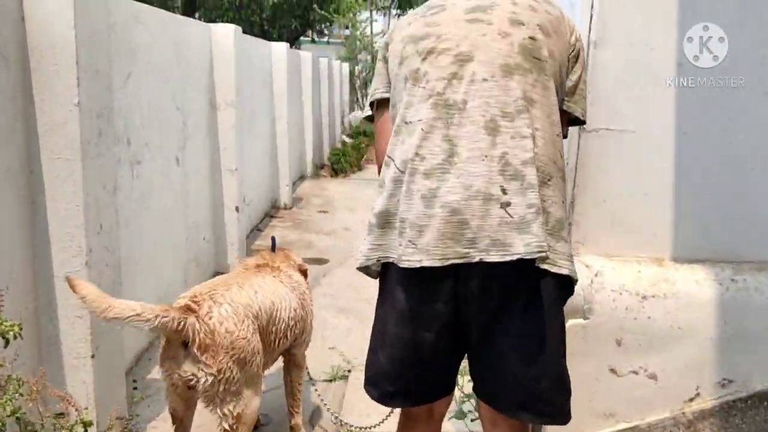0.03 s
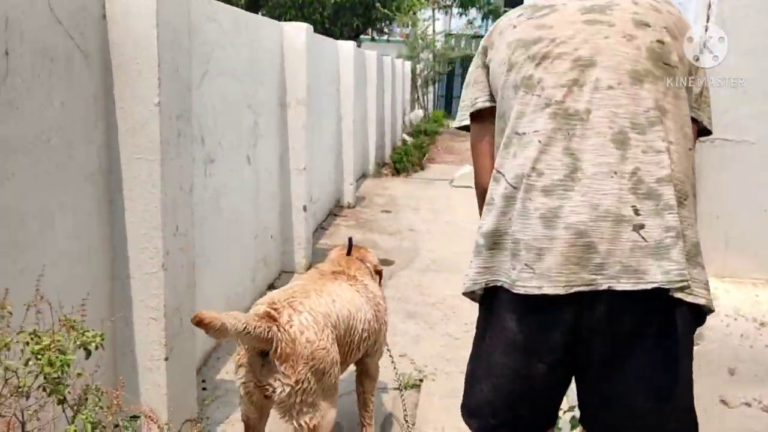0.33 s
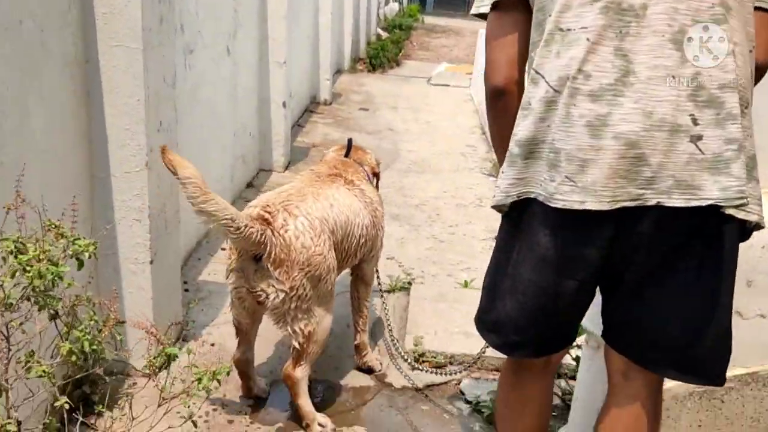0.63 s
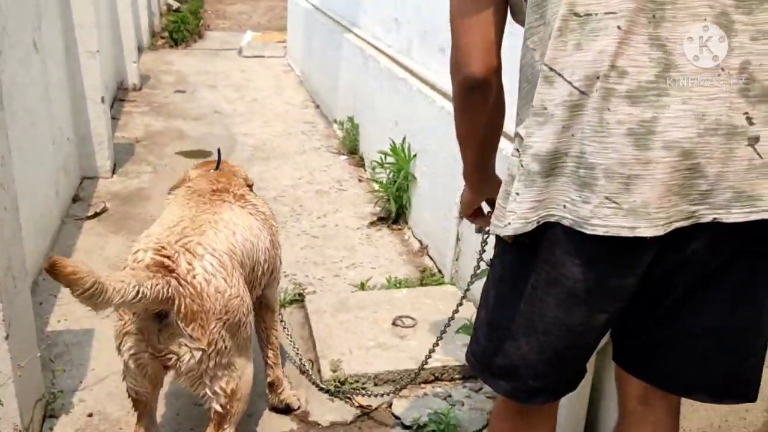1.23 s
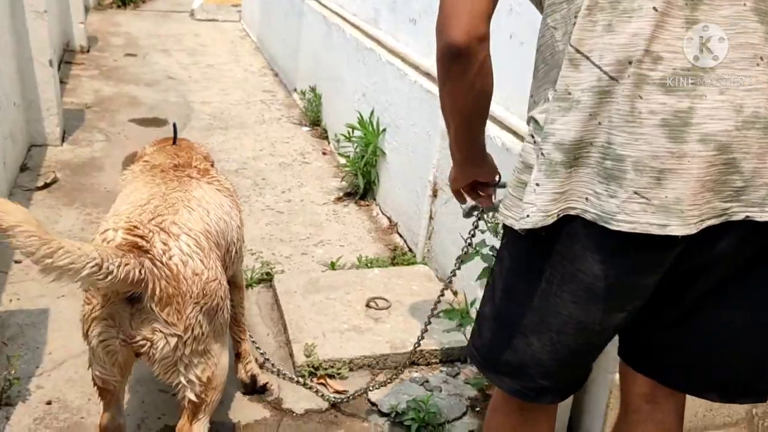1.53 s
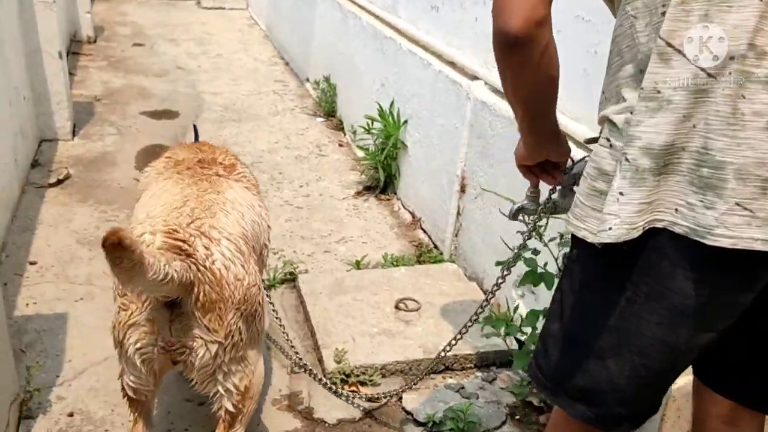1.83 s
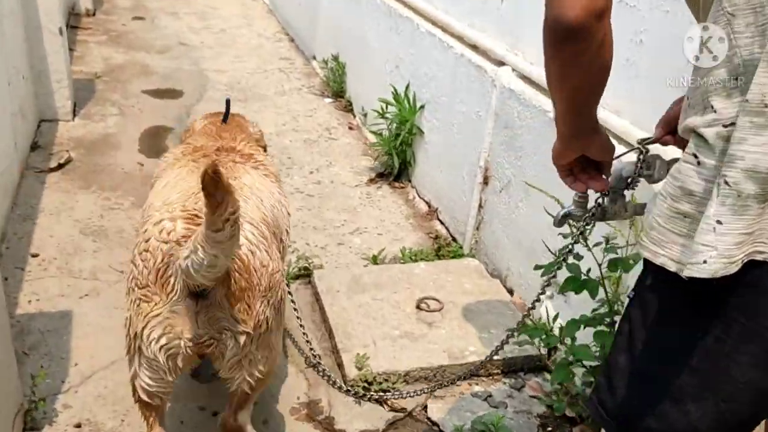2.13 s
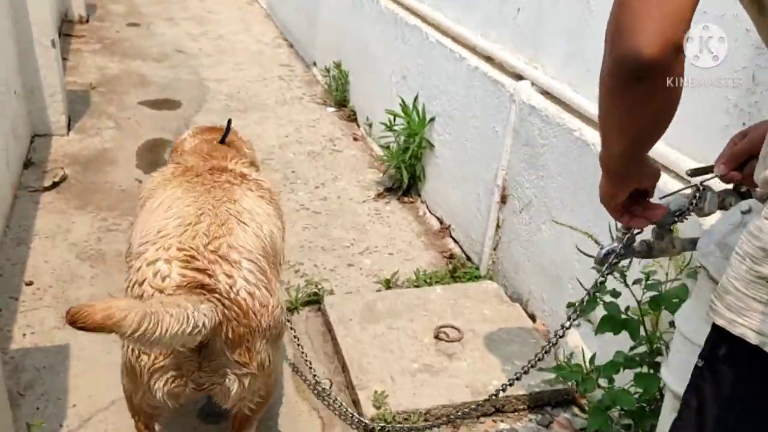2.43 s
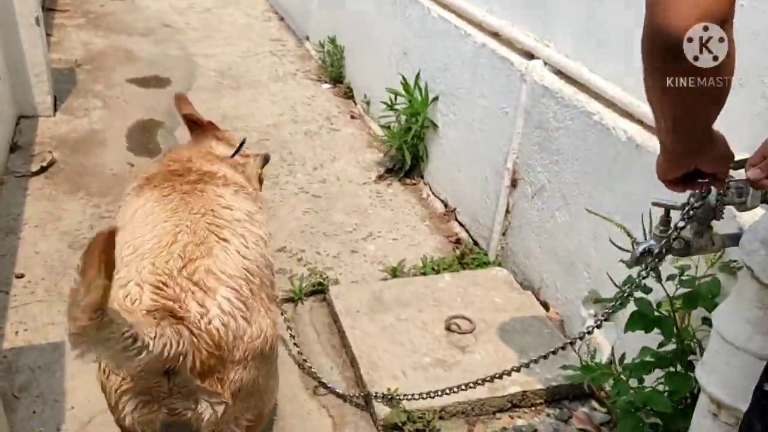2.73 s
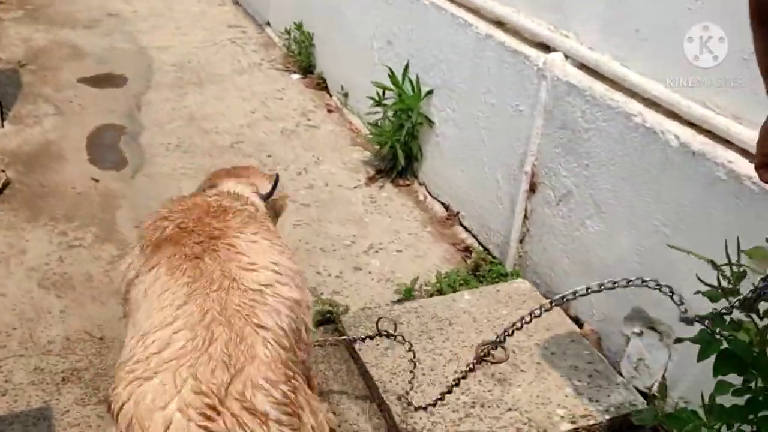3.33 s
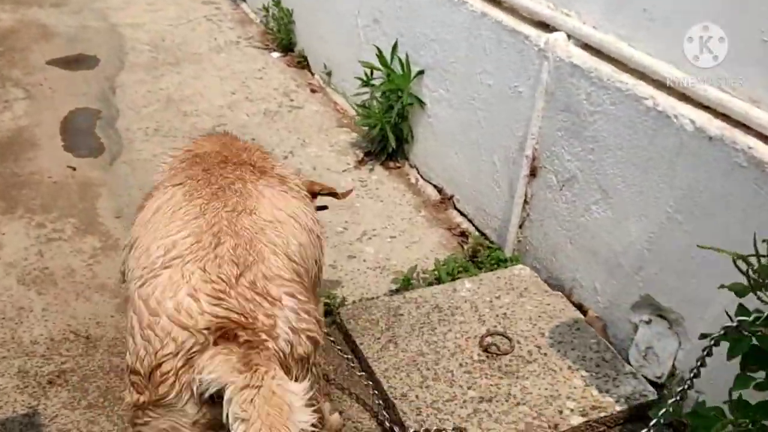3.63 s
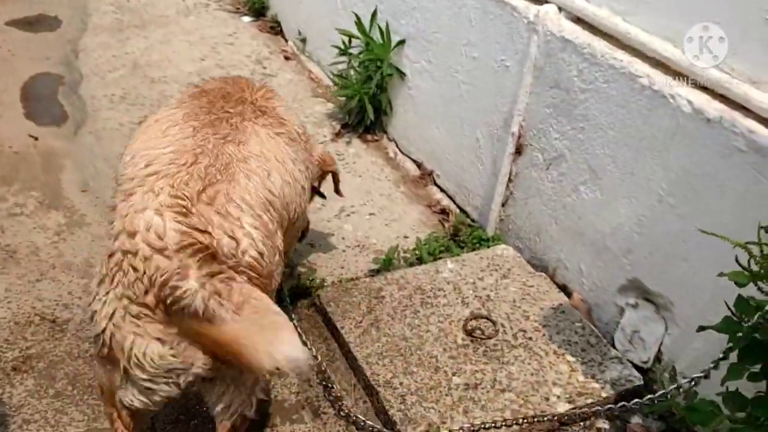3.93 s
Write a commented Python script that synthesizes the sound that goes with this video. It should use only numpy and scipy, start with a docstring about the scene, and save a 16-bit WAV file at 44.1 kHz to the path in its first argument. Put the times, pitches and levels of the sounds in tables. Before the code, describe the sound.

A dog's metal chain clinks lightly over gritty steps and faint panting in an outdoor concrete passage. Then the dog shakes its head, ears flapping, and the chain clatters and scrapes on the ground nearby, over steady high hiss.

```python
"""A concrete passage with a panting dog on a chain. Steel links collide and ring, a sandal scuffs grit,
then the dog shakes its head: ears slap, links clatter, scrape and crack on the slabs.
The pants are air rushing through a throat resonance; cloth and fur rustle; the walls reflect.
Behind it: outdoor air, a steady high hiss, a distant engine and a thin whistle like a far bird."""
import sys
import numpy as np
from scipy import signal
from scipy.fft import rfft, irfft
from scipy.io import wavfile

SR = 44100
rng = np.random.default_rng(int(sys.argv[2]) if len(sys.argv) > 2 else 0)


def waveform_to_disk(signal):
    """Save audio, clipped to [-1, 1], as 16-bit WAV at the path in sys.argv[1]."""
    frames = np.transpose(np.atleast_2d(signal))
    scaled = np.clip(frames, -1, 1) * 32767
    samples = np.round(scaled).astype(np.int16)
    wavfile.write(sys.argv[1], SR, samples)


N = 176400

# Spectra. Each row: frequency in Hz, relative gain in dB.
AIR_COLOUR = [(20, -10), (45, -6), (65, -9), (110, -6), (180, -2), (320, -5), (430, -11), (700, -14),
              (950, -13), (1300, -14), (1800, -19.5), (2800, -20), (4500, -28), (6000, -29), (9000, -31),
              (10200, -49), (15000, -53), (16200, -64)]
HISS_COLOUR = [(5500, -23), (6450, -11), (6850, -2), (7030, -18), (7230, 7.5), (7320, -9.5), (7430, 6.5),
               (7600, 2.5), (7700, -5), (7850, 3), (8100, -5), (8230, -2), (8550, -7), (9250, -17),
               (9800, -60)]
SAND_COLOUR = [(300, -18), (750, -2), (1400, 0), (2600, 3), (3800, -3), (6000, -25), (12000, -40)]  # coarse grain under a sole
GRIT_COLOUR = [(400, -16), (1500, -12.5), (2200, -12.5), (2950, -4.5), (3600, -14.5), (4500, -5),
               (5400, -9.5), (6700, -1.5), (7500, 2.5), (8600, -1.5), (10000, -16), (13000, -17),
               (15500, -23), (16300, -36)]  # snapping grain
SCRAPE_COLOUR = [(400, -7), (1200, -10), (3000, 0), (4200, 1), (6000, -3), (8000, 6), (10000, -17),
                 (15000, -11)]  # link dragged on slab
CRACK_COLOUR = [(300, -15), (1500, -11), (3000, -8), (5000, -3.5), (7500, 8), (9000, 7), (10500, -15),
                (14000, -7), (16000, -5)]  # link landing on slab
TICK_COLOUR = [(300, -3), (1000, -13), (2500, 0.5), (4500, -10.5), (5800, 0.5), (6800, 4), (7700, 13),
               (8900, 4), (10200, -14.5), (12600, -5), (14000, -9), (15400, -13), (16200, -38)]  # link contact
# Envelopes. Each row: time in seconds, relative level in dB.
AIR_LEVEL = [(0, -40.5), (.6, -42.5), (1.1, -40), (1.6, -41.5), (2.2, -41.5), (2.65, -42.5), (3.3, -39),
             (4, -42)]
HISS_LEVEL = [(0, -41), (.4, -42.5), (.9, -42.5), (1.4, -42.5), (1.7, -43), (2.1, -40.5), (2.45, -41.5),
              (2.75, -38), (3.3, -36.5), (4, -37.5)]
RUSTLE_LEVEL = [(0, -51.5), (.3, -57), (.55, -52.5), (.8, -59.5), (1.08, -50), (1.3, -53.5), (1.7, -58),
                (2.2, -55.5), (2.7, -60.5), (2.9, -52), (3.4, -55), (3.7, -44.5), (3.82, -48.5), (4, -57)]
SLIDE_LEVEL = [(.72, -55), (.8, -36), (.84, -31.5), (.865, -33), (.895, -36), (.92, -47), (.96, -60)]
DRAG_LEVEL = [(2.75, -82), (2.86, -52), (3.12, -48), (3.29, -45), (3.42, -45), (3.68, -39), (3.79, -45),
              (3.86, -52), (3.95, -45)]
JINGLE_LEVEL = [(0, -49), (.17, -51), (.25, -75), (.36, -45), (.46, -45), (.62, -47), (.72, -51),
                (.95, -50), (1.1, -48), (1.28, -41), (1.4, -71), (1.5, -69), (1.62, -60), (1.73, -85),
                (1.9, -64), (2.1, -70), (2.25, -80), (2.34, -74), (2.45, -73), (2.74, -72), (2.86, -58),
                (3.3, -41.5), (3.7, -33), (3.84, -38), (4, -55)]
# Stereo width of noise. Each row: frequency in Hz, left-right correlation from 0 to 1.
COHERENCE = [(30, 0.95), (150, 1), (300, 0.44), (600, 1), (1500, 0.4), (4000, 0.2), (16000, 0)]
# Stereo tilt. Each row: frequency in Hz, left over right in dB.
BALANCE = [(100, 4), (300, 5.5), (700, 3), (1300, 0), (2600, 3), (5500, 0), (6600, -2.5), (7400, -8.5),
           (8300, -2), (9200, 3), (13500, -2), (16000, 3)]
# Engine envelope times in seconds.
ENGINE_TIMES_S = [.3, .7, 1.5, 2.3, 2.8, 3.3, 4]
# Engine partials. Each row: frequency in Hz, then level in dB at each of ENGINE_TIMES_S.
ENGINE_PARTIALS = [(42.8, -50, -39.5, -40.5, -49, -40, -39.5, -46),
                   (90.6, -69, -63, -69, -46, -51, -39, -47), (128.4, -55, -48.5, -68, -68, -51, -65, -52),
                   (146.6, -37.5, -50.5, -48.5, -49, -42, -61, -46),
                   (168.9, -50, -46.5, -50, -40.5, -61, -53, -46),
                   (181, -50, -47.5, -68, -48, -45, -43, -40),
                   (226.3, -43, -45.5, -68, -57, -47.5, -70, -52),
                   (289.3, -45, -45.5, -48, -52.5, -52, -67, -73)]
# Far notes. Each row: start in seconds, length in seconds, level in dB.
WHISTLE_NOTES = [(1.123, .06, -51), (1.19, .1, -53.5), (1.329, .14, -46), (1.543, .14, -45),
                 (1.683, .19, -52.5), (1.858, .11, -56)]
# Dull blows. Each row: start in seconds, level in dB, centre in Hz.
FOOTFALLS = [(1.01, -41, 820), (1.055, -48, 840), (1.47, -50.5, 860), (2.665, -38.5, 327),
             (3.062, -37, 237), (3.162, -35.5, 212), (3.265, -41, 328), (3.345, -40, 250), (3.71, -44, 243),
             (3.877, -33, 220), (3.982, -36, 815)]
EAR_SLAPS = [(2.829, -34.5, 1000), (2.873, -34, 920), (2.889, -34, 1100), (2.99, -39.5, 1160),
             (3.086, -37, 1000), (3.18, -35.5, 1000), (3.272, -39.5, 690), (3.366, -35, 1020),
             (3.457, -36.5, 1000), (3.52, -37.5, 575)]
# Soles landing on sand. Each row: start in seconds, decay in seconds, level in dB.
SOLE_SCUFFS = [(0.508, 0.045, -38), (0.687, 0.014, -39), (0.828, 0.035, -44), (1.009, .025, -40.5),
               (1.062, 0.057, -42), (1.19, 0.044, -47), (1.262, 0.044, -43), (1.468, 0.014, -44.5)]
# Pants and huffs. Each row: start in seconds, length in seconds, level in dB, throat resonance in Hz.
BREATHS = [(0.087, 0.095, -56, 1150), (0.362, 0.086, -57, 1280), (0.546, 0.046, -52, 1350),
           (0.678, 0.11, -55, 1200), (1.673, 0.096, -51.5, 1180), (1.865, 0.091, -48, 1235),
           (2.156, 0.09, -47, 1250), (2.314, 0.071, -49.5, 1200), (2.505, 0.088, -52, 1350),
           (2.991, 0.042, -45, 1370), (3.637, 0.042, -33.5, 1373), (3.69, 0.04, -33, 1350),
           (3.72, 0.051, -35.5, 1900), (3.918, 0.036, -33.5, 1360), (3.982, 0.026, -30.5, 1650)]
# Contact clusters. Each row: start and length in seconds, then relative low, mid and high level in dB.
GRIT_BURSTS = [(0.83, 0.011, -37, -38, -43), (0.848, 0.0019, -29.5, -25, -43),
               (0.855, 0.0069, -36, -28, -40), (0.864, 0.004, -41, -24.5, -39),
               (0.872, 0.018, -39, -30.5, -37.5), (0.888, 0.016, -51, -36, -53),
               (0.978, 0.008, -40, -32.5, -49), (1.968, 0.0054, -38.5, -26, -43),
               (2.062, 0.019, -41.5, -37, -52), (2.592, 0.003, -41.5, -32, -57),
               (2.749, 0.006, -44, -35, -42), (2.788, 0.0045, -47, -22.5, -39),
               (2.796, 0.033, -37, -32.5, -44)]
CHAIN_BURSTS = [(0.012, 0.013, -48.5, -36, -48), (0.094, 0.017, -44.5, -38, -49),
                (0.16, 0.01, -45, -40.5, -47), (0.39, 0.016, -50, -44, -60), (0.446, 0.019, -44, -36, -42),
                (0.505, 0.021, -39, -29.5, -33.5), (0.535, 0.026, -44.5, -38, -42),
                (0.578, 0.05, -53, -40, -49), (0.645, 0.13, -60, -48, -66), (1.012, 0.024, -40.5, -43, -54),
                (1.055, 0.043, -41.5, -38, -51), (1.132, 0.014, -44, -45, -52),
                (1.19, 0.024, -44.5, -38.5, -46), (1.24, 0.048, -44.5, -37, -42.5),
                (1.468, 0.026, -44, -44, -53), (1.604, 0.003, -54, -48, -54), (2.326, 0.003, -61, -47, -51),
                (2.648, 0.004, -58, -57, -58), (2.832, 0.026, -39.5, -31, -39),
                (2.872, 0.024, -33.5, -27.5, -41), (2.925, 0.049, -50, -39.5, -48),
                (2.985, 0.017, -38, -31.5, -43), (3.01, 0.019, -38, -27, -30),
                (3.085, 0.017, -37, -30, -37.5), (3.159, 0.0049, -47, -27.5, -33),
                (3.179, 0.017, -30, -21, -25), (3.223, 0.0046, -42, -25.5, -28),
                (3.246, 0.0095, -37.5, -22, -28), (3.3, 0.025, -48, -31, -40),
                (3.368, 0.0084, -34, -29, -42), (3.385, 0.03, -42.5, -39, -42),
                (3.429, 0.019, -35.5, -24.5, -26), (3.458, 0.019, -37, -29, -38),
                (3.516, 0.012, -30, -19, -25), (3.533, 0.026, -33, -43, -42),
                (3.585, 0.0033, -43, -26, -36), (3.597, 0.017, -37.5, -24, -28),
                (3.625, 0.0074, -27, -34, -36), (3.645, 0.023, -28.5, -24.5, -36),
                (3.698, 0.018, -38.5, -25.5, -32), (3.734, 0.0052, -25, -29, -33),
                (3.881, 0.0075, -37, -31.5, -39), (3.916, 0.028, -39.5, -30, -32),
                (3.962, 0.014, -35.5, -35, -49), (3.987, 0.014, -34, -26, -40)]
# Cluster band edges in Hz: start and end of the low-mid fade, then of the mid-high fade.
CROSSOVERS_HZ = [5200, 6300, 9600, 10600]
# Modes of a steel link. Each row: frequency in Hz, relative level in dB, T60 in seconds.
LINK_MODES = [(6400, -6, 0.12), (7340, -1, 0.047), (8090, 7, 0.028), (8620, -0.5, 0.043), (9230, 0, 0.092),
              (11200, -14, 0.05), (11830, -12, 0.055), (13640, -6, .08), (14250, -5, 0.074),
              (14600, -12, 0.053), (15600, -6, 0.086)]
# Links ringing free. Each row: start in seconds, level in dB, frequency in Hz, T60 in seconds.
LINK_PINGS = [(0.448, -28.5, 9360, 0.14), (0.452, -29.5, 6380, 0.11), (0.575, -31, 9320, .1),
              (0.578, -35, 6400, 0.21), (0.512, -38, 13800, .09), (1.075, -38, 9210, 0.21),
              (1.133, -33, 14300, .06), (1.197, -28.5, 14340, 0.12), (1.225, -38, 14600, .12),
              (1.272, -38, 14400, .12), (1.615, -38, 9170, .13), (3.014, -22.5, 6400, 0.089),
              (3.181, -24.5, 9030, 0.088), (3.016, -38, 11700, .11), (3.226, -28, 15280, .09),
              (3.44, -34, 11700, .1), (3.312, -23.5, 8980, 0.1), (3.433, -28, 13700, .07),
              (3.464, -21.5, 9160, 0.14), (3.468, -21, 14720, .07), (3.597, -15.5, 9230, 0.077),
              (3.626, -17, 6440, 0.056), (3.648, -26, 14250, .1), (3.702, -26, 14050, 0.089),
              (3.737, -25, 6500, 0.044), (3.79, -34, 6380, 0.25), (3.822, -28, 9230, 0.066),
              (3.918, -25, 9260, 0.068)]
# Links landing hard. Each row: start in seconds, level in dB.
SLAB_CRACKS = [(0.5067, -29.5), (3.2237, -25), (3.368, -24.5), (3.5197, -17), (3.5963, -23), (3.625, -17),
               (3.736, -14.5), (3.8803, -20), (3.987, -22.5)]


def amp(db):
    """Decibels to gain."""
    return 10 ** (np.asarray(db) / 20)


def unit(x):
    """Scales to rms 1."""
    return x / np.sqrt(np.mean(x ** 2) + 1e-20)


def decay(t, t60_s):
    """Falls 60 dB in t60_s."""
    return np.exp(-np.log(1000) * t / t60_s)


def spectrum(points, hz):
    """Reads (Hz, value) points on a log axis."""
    f, v = np.transpose(points)
    return np.interp(np.log(hz + 1), np.log(f + 1), v)


def level(points):
    """Gain per sample from (s, dB) points."""
    return amp(np.interp(np.arange(N) / SR, *np.transpose(points)))


def freqs(x):
    """FFT bins of x in Hz."""
    return np.fft.rfftfreq(x.shape[-1], 1 / SR)


def shape(x, gain):
    """Filters x by a gain per bin."""
    return irfft(rfft(x) * gain, x.shape[-1])


def tint(x, colour):
    """Filters x by (Hz, dB) points."""
    return shape(x, amp(spectrum(colour, freqs(x))))


def pan(db):
    """Channel gains, left over right by db."""
    return amp(np.array([[.5], [-.5]]) * db)


def add(mix, start_s, sound):
    """Mixes a sound in at start_s."""
    part = mix[:, max(round(start_s * SR), 0):][:, :sound.shape[-1]]
    part += sound[..., :part.shape[1]]


def drift(rate_hz):
    """Slow random motion, rms 1."""
    x = rng.standard_normal(N)
    return unit(shape(x, np.exp(-(freqs(x) / rate_hz) ** 2)))


def noise(size):
    """Stereo noise, alike in the bass, unrelated in the treble."""
    a, b = rng.standard_normal((2, size))
    same = np.clip(spectrum(COHERENCE, freqs(a)), -1, 1)
    return np.array([a, shape(a, same) + shape(b, np.sqrt(1 - same ** 2))])


def puff(hz, width_oct, size):
    """Noise in one resonance, rms 1."""
    x = noise(size)
    offset_oct = np.log2((freqs(x) + 1) / hz)
    return unit(shape(x, 1 / (1 + (offset_oct / width_oct) ** 2)))


def tick(colour, decay_s, size=1000):
    """One hard contact, energy 1."""
    t = (np.arange(size) - 40) / SR
    x = tint(rng.standard_normal((2, size)) * np.exp(-abs(t) / decay_s) * (t >= 0), colour)
    return x / np.linalg.norm(x)


def patter(voices, per_s, scatter_db):
    """Contacts at random moments, rms 1."""
    out = np.zeros((2, N))
    chance, strength = rng.random(N), rng.standard_normal(N)
    for at in np.flatnonzero(chance < per_s / SR):
        add(out, at / SR, amp(scatter_db * np.clip(strength[at], -2, 2)) * voices[at % len(voices)])
    return unit(out)


def bursts(rows, voices, per_s, scatter_db, rebound_s=.0043, accent_db=3):
    """Contact clusters on three voices each, with dying rebounds, levelled in three bands."""
    out = np.zeros((2, N))
    for start_s, length_s, *band_db in rows:
        cluster, draws = np.zeros((2, 18000)), rng.random((80, 2))
        trio = rng.integers(len(voices), size=3)
        for k, (jitter, softness) in enumerate(draws):
            at_s = (k + jitter * (k > 0)) / per_s
            if at_s < length_s + 6 * rebound_s:
                fade = np.exp(-max(at_s - length_s, 0) / rebound_s)
                hit_db = accent_db * (k == 0) - scatter_db * np.log(softness + .05)
                add(cluster, at_s, fade * amp(hit_db) * voices[trio[k % 3]])
        band = np.interp(freqs(cluster), CROSSOVERS_HZ, [0, 1, 1, 2.5])
        for k, db in enumerate(band_db):
            part = shape(cluster, np.maximum(1 - abs(band - k), 0))
            rms = np.sqrt(np.sum(part ** 2) / (2 * (length_s + rebound_s) * SR))
            add(out, start_s - .001, amp(db) * part / rms)
    return out


def soft_hits(rows, rise_s, width_oct, size=8000):
    """Dull blows: puffs that swell and die."""
    out, u = np.zeros((2, N)), np.arange(size) / SR / rise_s
    swell = u * np.exp(1 - u)
    swell_rms = np.sqrt(np.mean(swell ** 2))
    for start_s, db, hz in rows:
        add(out, start_s, amp(db) * swell_rms * unit(swell * puff(hz, width_oct, size)))
    return out


def walls(x, t60_s, delay_s=.0049):
    """Scattered reflections off the passage walls."""
    t = np.arange(SR // 2) / SR
    taps = rng.standard_normal((2, len(t))) * (rng.random((2, len(t))) < .05)
    taps *= (t > delay_s) * decay(t, t60_s)
    taps /= np.linalg.norm(taps, axis=1, keepdims=True)
    return signal.fftconvolve(x, taps, axes=1)[:, :N]


def outdoor_air(sway_db=.7):
    """Broad, low noise that sways gently."""
    return unit(tint(noise(N), AIR_COLOUR)) * level(AIR_LEVEL) * amp(sway_db * drift(rate_hz=7.8))


def hiss(flicker_db=.16):
    """Narrow high noise with a faint flicker."""
    band = unit(tint(noise(N), HISS_COLOUR))
    return band * level(HISS_LEVEL) * amp(flicker_db * drift(rate_hz=40)) * pan(db=-.5)


def engine(wander_hz=.91, flutter_db=2):
    """A distant engine hums in wavering low partials."""
    out = np.zeros(N)
    for hz, *db in ENGINE_PARTIALS:
        turns = np.cumsum(hz + wander_hz * drift(rate_hz=4.34)) / SR
        gain = level(list(zip(ENGINE_TIMES_S, db))) * amp(flutter_db * drift(rate_hz=4.4))
        out += gain * np.sin(2 * np.pi * turns)
    return out * pan(db=.5)


def whistle(hz=3280, waver=.0051, flutter_db=2.5):
    """Thin far notes near one pitch, blurred by echoes."""
    out = np.zeros((2, N))
    for start_s, length_s, db in WHISTLE_NOTES:
        u = np.arange(0, length_s, 1 / SR) / length_s
        turns = np.cumsum(hz * (1 + waver * drift(rate_hz=106)[:len(u)])) / SR
        add(out, start_s, amp(db) * np.sin(np.pi * np.sqrt(u)) * np.sin(2 * np.pi * turns))
    out *= amp(flutter_db * drift(rate_hz=71))
    return out + amp(-7) * walls(out, t60_s=.5)


def rustle(flicker_db=2):
    """Cloth and fur brush unevenly as man and dog move."""
    brush = puff(hz=1000, width_oct=.92, size=N)
    return brush * level(RUSTLE_LEVEL) * amp(flicker_db * drift(rate_hz=61))


def footfalls():
    """Feet land with soft thuds."""
    return soft_hits(FOOTFALLS, rise_s=.012, width_oct=.2)


def scuffs(rise_s=.003):
    """Soles grind coarse sand as they land."""
    envelope, t = np.zeros((2, N)), np.arange(9000) / SR
    grains = [tick(SAND_COLOUR, decay_s=.00072) for _ in range(24)]
    for start_s, decay_s, db in SOLE_SCUFFS:
        add(envelope, start_s, amp(db) * (1 - np.exp(-t / rise_s)) * np.exp(-t / decay_s))
    return envelope * patter(grains, per_s=640, scatter_db=1.5)


def grit():
    """A sandal slides over grit; grains snap on the concrete."""
    grains = [tick(GRIT_COLOUR, decay_s=.0012) for _ in range(24)]
    slide = patter(grains, per_s=2500, scatter_db=.5) * level(SLIDE_LEVEL)
    crunch = bursts(GRIT_BURSTS, grains, per_s=900, scatter_db=.5)
    return (crunch + slide) * pan(db=-2)


def panting(size=8000):
    """Short rushes of air through the dog's throat resonance."""
    out, t = np.zeros((2, N)), np.arange(size) / SR
    for start_s, length_s, db, hz in BREATHS:
        throat = puff(hz, width_oct=.099, size=size)
        breath = amp(-4.5) * puff(hz, width_oct=.93, size=size)
        swell = np.sin(np.pi * np.minimum(t / length_s, 1))
        add(out, start_s, amp(db) * (throat + breath) * swell)
    return out


def ear_flaps():
    """Ears slap as the dog shakes its head."""
    return soft_hits(EAR_SLAPS, rise_s=.0051, width_oct=.5)


def drag():
    """Slack links scrape over the slab."""
    catches = [tick(SCRAPE_COLOUR, decay_s=.0007) for _ in range(24)]
    return patter(catches, per_s=450, scatter_db=5.5) * level(DRAG_LEVEL)


def cracks(decay_s=.0018, rebound_s=.004, rebound_db=-1.5):
    """A link lands flat on the slab: a wide crack and a quick rebound."""
    out = np.zeros((2, N))
    for start_s, db in SLAB_CRACKS:
        for delay_s, drop_db in (0, 0), (rebound_s, rebound_db):
            hit = tick(CRACK_COLOUR, decay_s, size=2000) * np.sqrt(2 * decay_s * SR)
            add(out, start_s + delay_s - .001, amp(db + drop_db) * hit)
    return out


def pings(rise_s=.0013, split_hz=65, twin_db=-4):
    """A link swings free after a knock and rings on a close pair of modes."""
    out, t = np.zeros((2, N)), np.arange(12000) / SR
    for start_s, db, hz, t60_s in LINK_PINGS:
        phase = rng.random((2, 2, 1))
        mode = np.sin(2 * np.pi * (hz * t + phase[0]))
        twin = amp(twin_db) * np.sin(2 * np.pi * ((hz + split_hz) * t + phase[1]))
        envelope = (1 - np.exp(-t / rise_s)) * decay(t, t60_s)
        add(out, start_s, amp(db) * (mode + twin) * envelope)
    return out


def link(ring_db, detune=.013, scatter_db=5, clack_range_hz=(1900, 5960), size=10000):
    """A struck link: a tick, a short four-pitch clack and slightly detuned modes."""
    t = np.arange(size) / SR
    ring, clack = np.zeros((2, 2, size))
    for hz, db, t60_s in LINK_MODES:
        turns = hz * (1 + detune * rng.standard_normal()) * t + rng.random((2, 1))
        gain = amp(db + scatter_db * rng.standard_normal())
        ring += gain * decay(t, t60_s) * np.sin(2 * np.pi * turns)
    for hz in rng.uniform(*clack_range_hz, 4):
        clack += decay(t, t60_s=.035) * np.sin(2 * np.pi * (hz * t + rng.random((2, 1))))
    contact = tick(TICK_COLOUR, decay_s=.0017, size=size)
    return contact + amp(ring_db) * ring / np.linalg.norm(ring) + amp(-6) * clack / np.linalg.norm(clack)


def chain():
    """Steel links jingle as the chain sways, and clatter as they collide."""
    struck = [link(ring_db=3.5) for _ in range(48)]
    touched = [link(ring_db=12) for _ in range(24)]
    jingle = patter(touched, per_s=75, scatter_db=3) * level(JINGLE_LEVEL)
    clatter = bursts(CHAIN_BURSTS, struck, per_s=480, scatter_db=1.5)
    return (clatter + jingle) * pan(db=-1.5)


def scene(left_lag_s=.000451):
    """Events with wall reflections, over a background that arrives later on the left."""
    events = amp(-1.5) * chain() + amp(-2) * grit() + pings() + cracks() + drag() + scuffs()
    events += panting() + rustle() + whistle() + ear_flaps() + footfalls()
    background = engine() + outdoor_air() + hiss()
    lag = np.exp(-2j * np.pi * freqs(background) * np.array([[left_lag_s], [0]]))
    return events + amp(-6) * walls(events, t60_s=.17) + shape(background, lag)


def record(dry, cutoff_hz=15800):
    """Left-right colouring, then a low-pass."""
    coloured = shape(dry, pan(spectrum(BALANCE, freqs(dry))))
    low_pass = signal.firwin(401, cutoff_hz, window=("kaiser", 9), fs=SR)
    return signal.oaconvolve(coloured, low_pass[None], "same")


dry = scene()
out = record(dry)
waveform_to_disk(out)
```